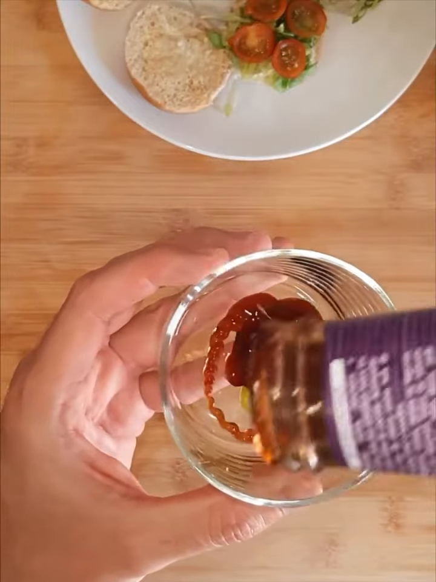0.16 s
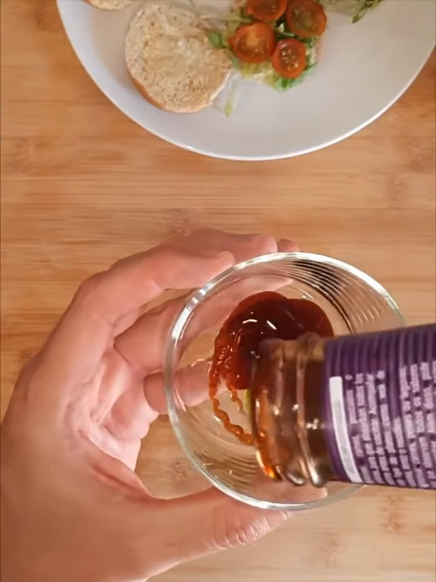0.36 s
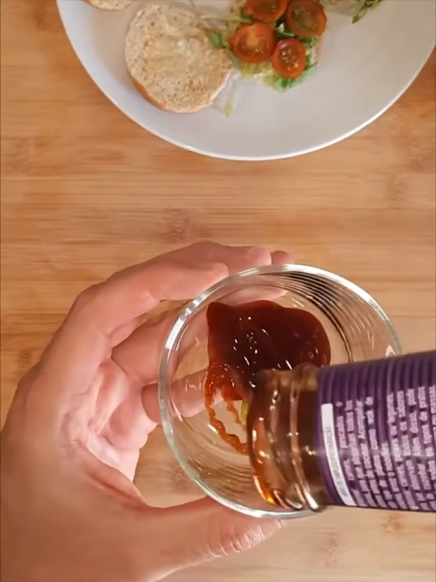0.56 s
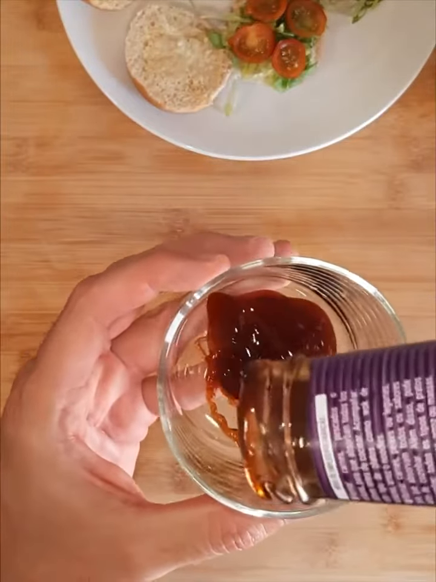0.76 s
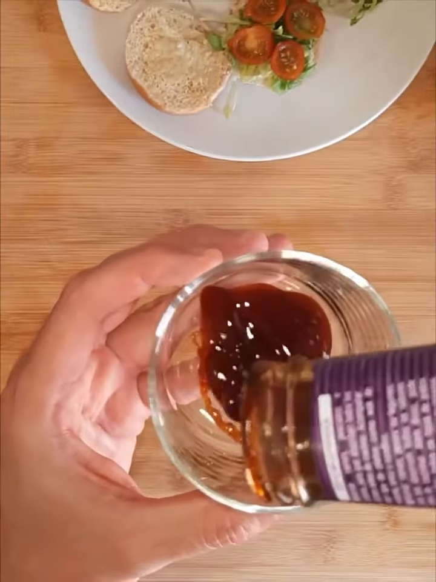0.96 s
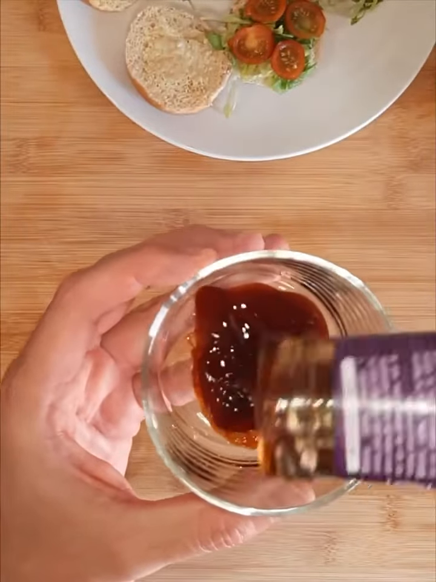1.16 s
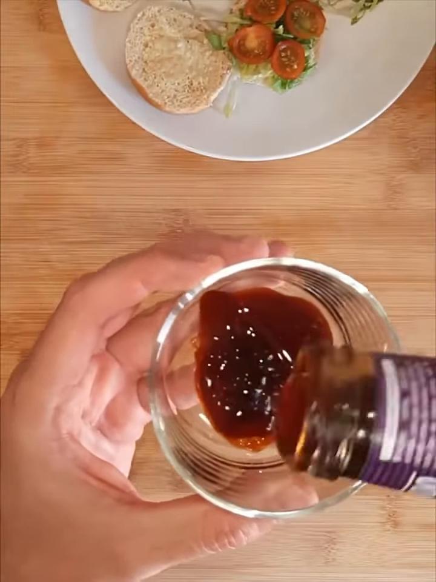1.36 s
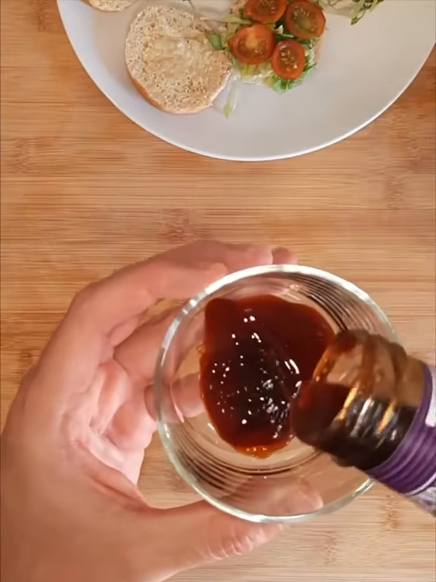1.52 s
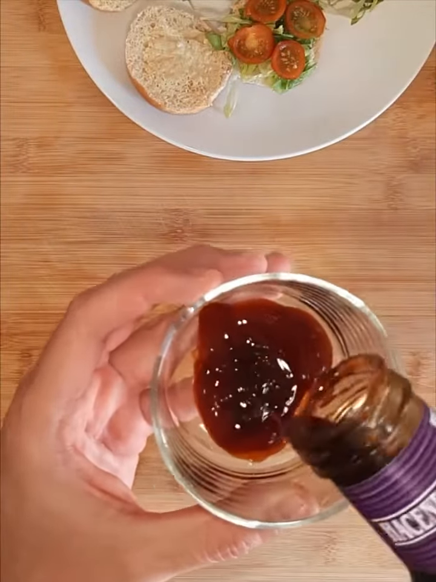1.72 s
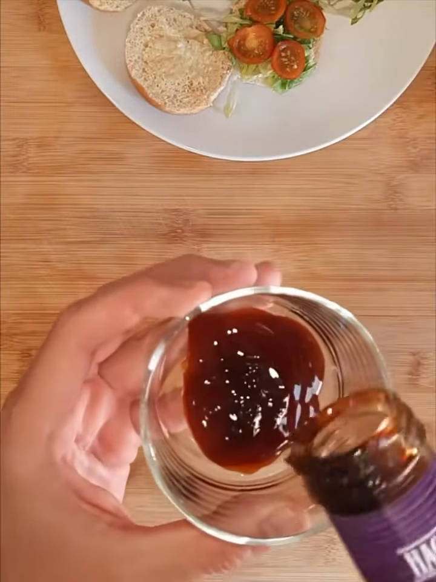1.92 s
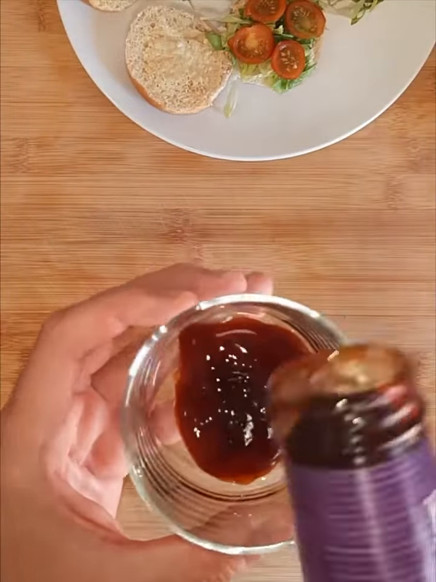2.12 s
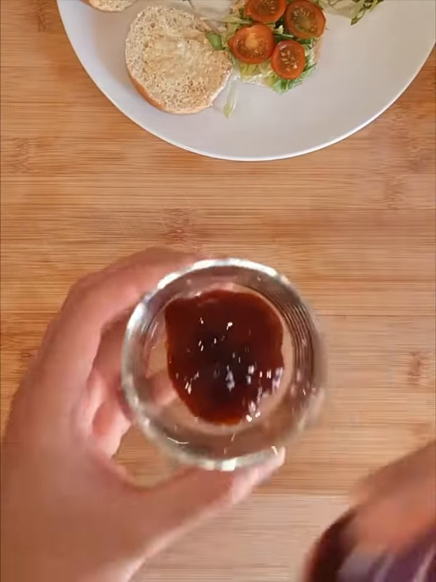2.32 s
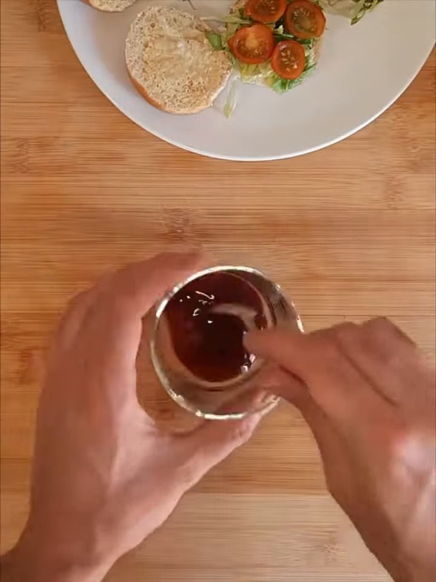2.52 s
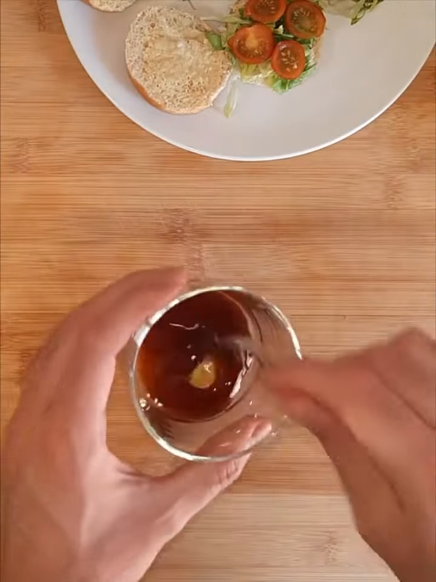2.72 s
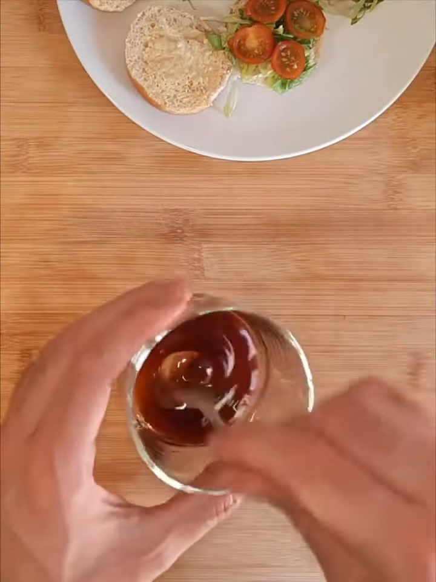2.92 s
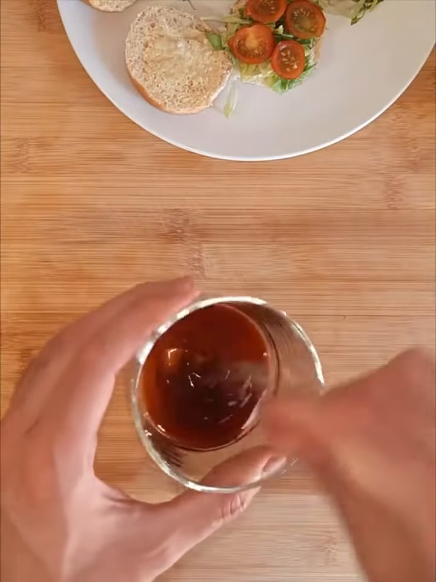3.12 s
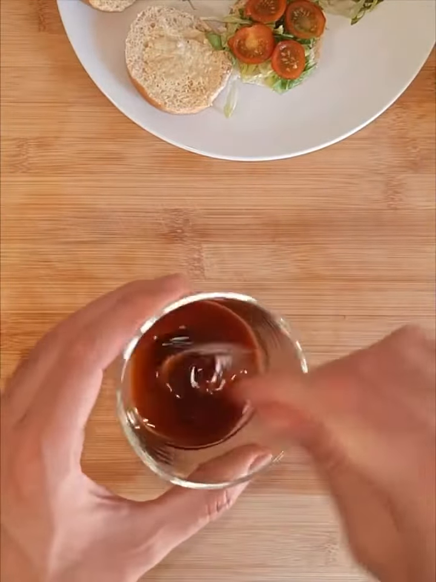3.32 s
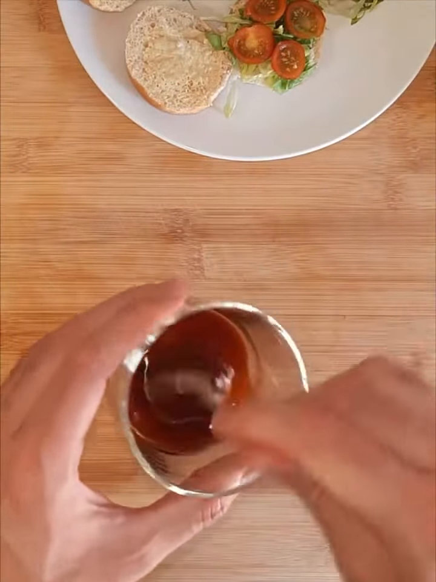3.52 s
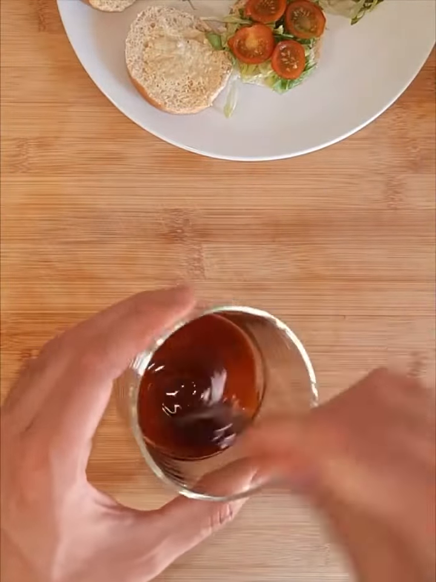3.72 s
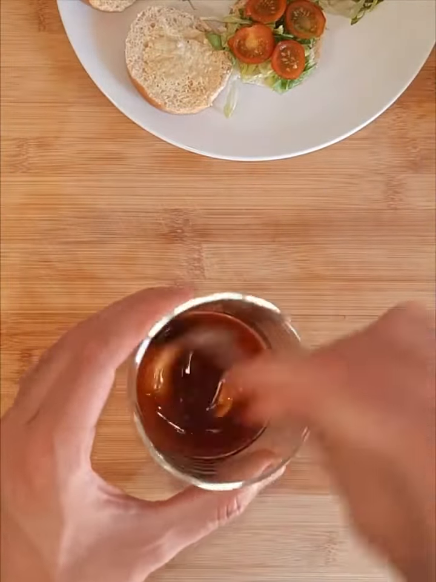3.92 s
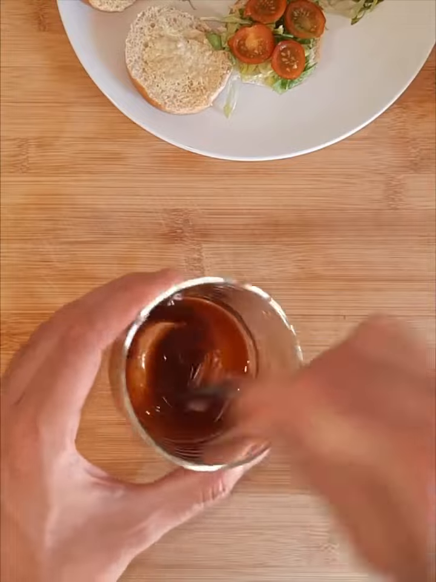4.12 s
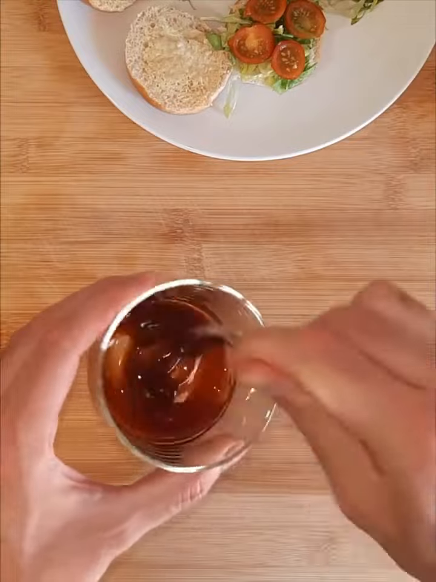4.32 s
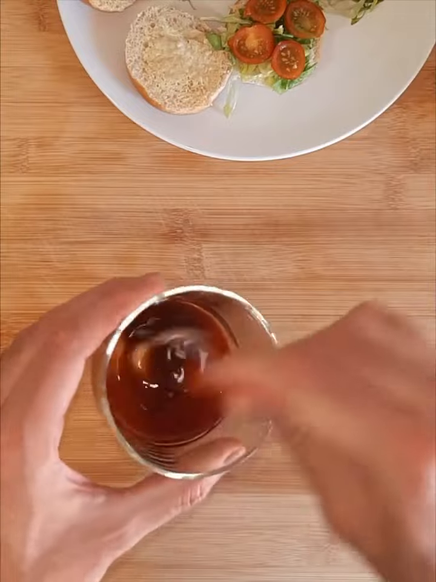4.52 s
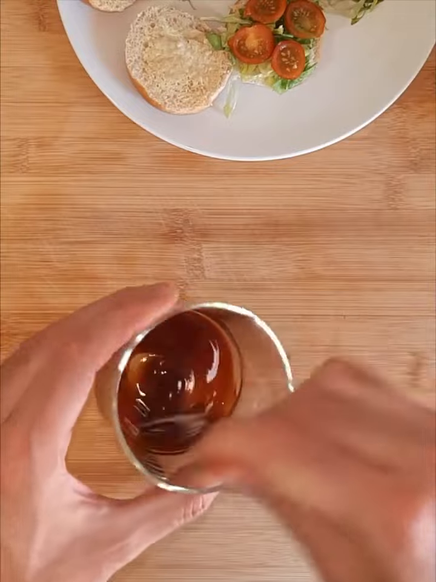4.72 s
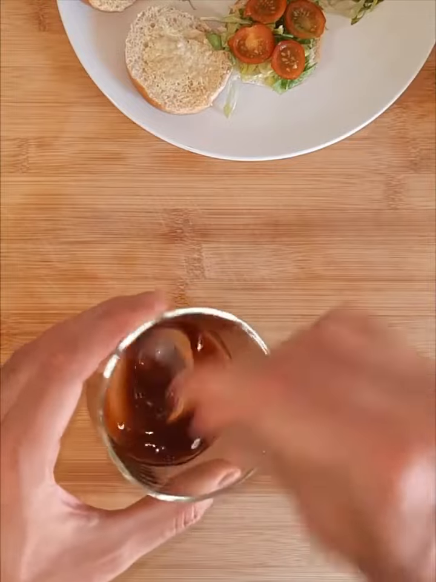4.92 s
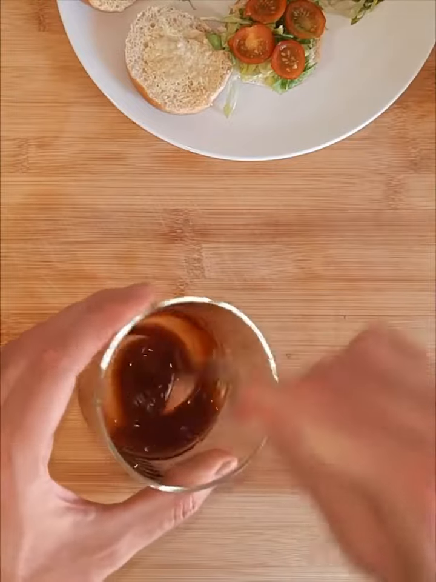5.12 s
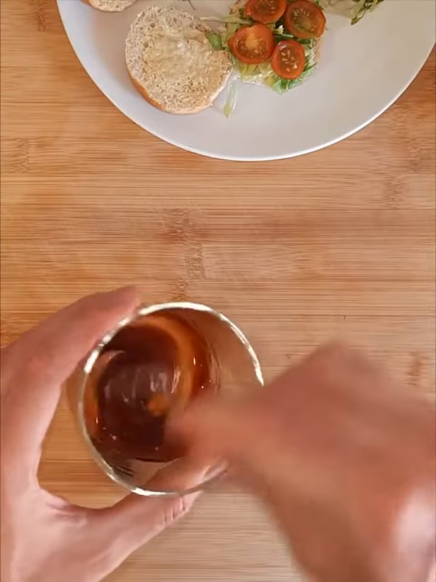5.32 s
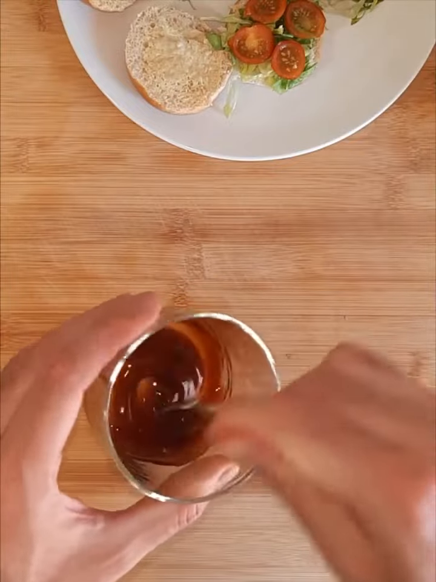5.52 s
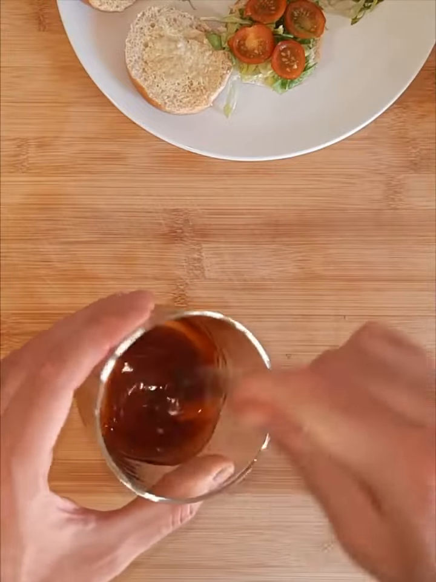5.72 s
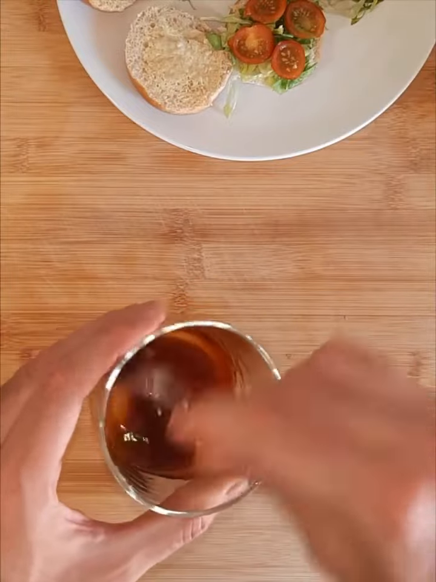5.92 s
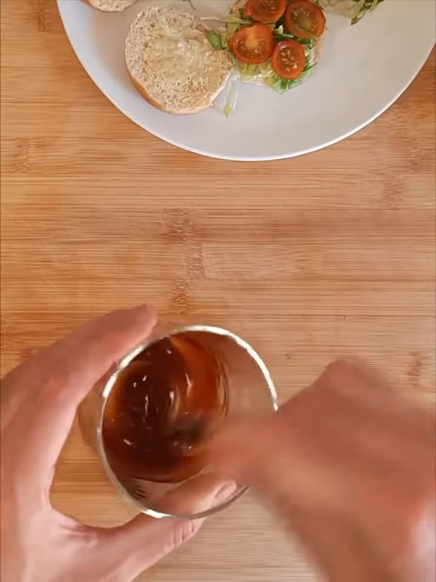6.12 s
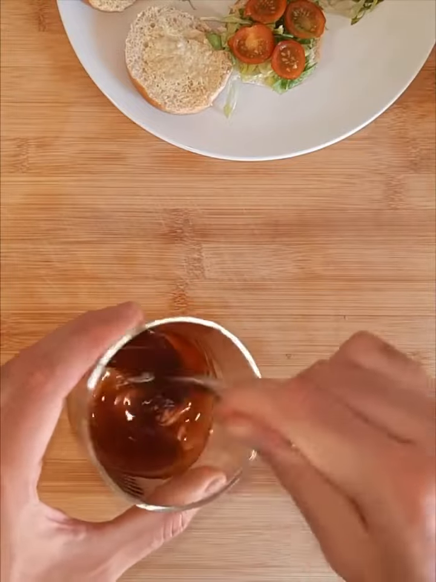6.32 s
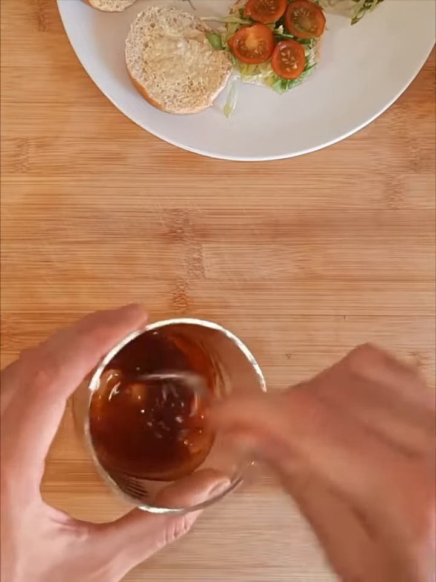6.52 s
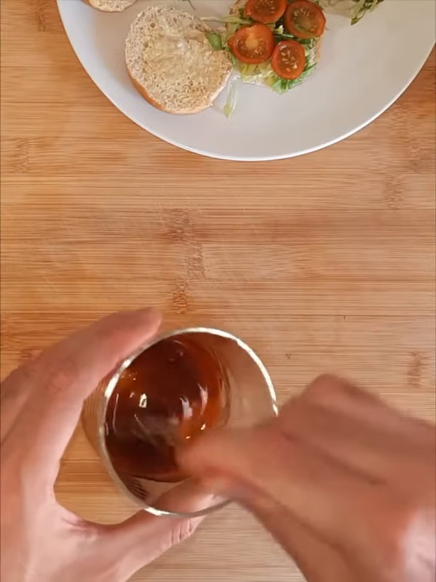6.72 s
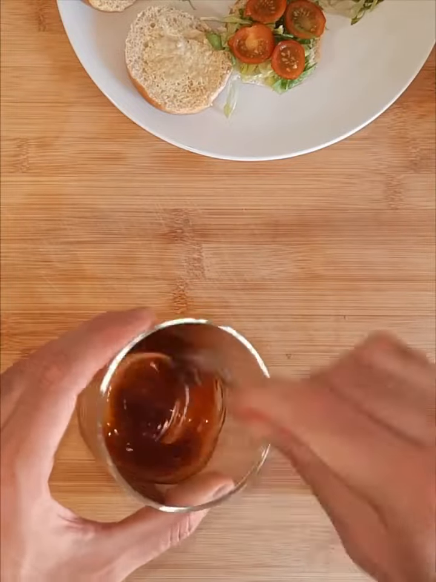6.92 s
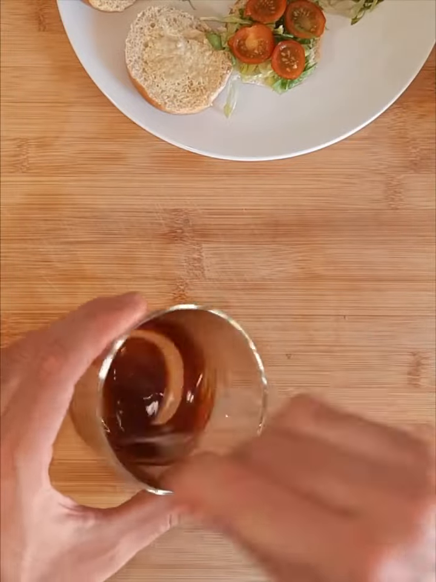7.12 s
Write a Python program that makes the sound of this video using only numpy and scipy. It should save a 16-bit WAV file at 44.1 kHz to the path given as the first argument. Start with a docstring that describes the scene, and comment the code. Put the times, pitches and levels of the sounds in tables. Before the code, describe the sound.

Thick sauce glugs faintly from a bottle into a small glass, then a metal spoon drops in and stirs briskly, clinking brightly against the sides.

```python
"""In a small hard-walled kitchen, thick sauce glugs softly from a bottle into a small hand-held glass.
Gulps of air squelch as shaped noise; the sauce swishes as noise that surges and plops as rising tones.
A steel spoon lands in the glass and stirs, rubbing and scraping as gritty noise. Its many clinks
are short blows that ring the modes of glass and spoon. The microphones are close above."""
import sys
import numpy as np
from scipy import signal
from scipy.fft import rfft, irfft, next_fast_len
from scipy.io import wavfile
from scipy.ndimage import map_coordinates

SR = 44100
rng = np.random.default_rng(int(sys.argv[2]) if len(sys.argv) > 2 else 0)


def generate_wav(signal):
    """Clip the signal to [-1, 1] and save it as 16-bit WAV at the path in sys.argv[1]."""
    frames = np.transpose(np.atleast_2d(signal))
    scaled = np.clip(frames, -1, 1) * 32767
    pcm = np.round(scaled).astype(np.int16)
    wavfile.write(sys.argv[1], SR, pcm)


N = 315756

HIT = 16384  # samples in the sound of one blow
LEAD_S = .004  # room left for the graze before a hit
TOP_HZ = 15950  # nothing is kept above this pitch


def amp(db):
    """Turn decibels into a gain."""
    return 10 ** (np.asarray(db) / 20)


def unit(x):
    """Scale to an rms of 1."""
    return x / np.sqrt(np.mean(x ** 2) + 1e-20)


def along(points, hz):
    """Read a (pitch_hz, value) table at any pitch, on a log pitch axis."""
    f, v = np.transpose(points)
    return np.interp(np.log(hz + 1), np.log(f + 1), v)


def curve(rows):
    """Join (time_s, value) rows by straight lines, one value per sample."""
    return np.interp(np.arange(N) / SR, *np.transpose(rows))


def wobble(rate):
    """Draw a smooth random curve with this many knots a second."""
    knots = rng.standard_normal(int(N * rate / SR) + 4)
    return map_coordinates(knots, [np.arange(N) * rate / SR])


def swells(rows):
    """Gain of smooth swells, one for each (middle_s, length_s, level_db) row."""
    t = np.arange(N) / SR
    return sum(amp(db) * np.cos(np.pi * np.clip((t - s) / length, -.5, .5)) ** 2 for s, length, db in rows)


def filtered(x, response):
    """Colour a sound with a response that depends on frequency."""
    m = next_fast_len(N + SR // 2)
    return irfft(rfft(x, m) * response(np.fft.rfftfreq(m, 1 / SR)), m)[..., :N]


def add(track, s, sound):
    """Mix a sound into the track at time s."""
    start = max(round(s * SR), 0)
    track[:, start:start + sound.shape[1]] += sound[:, :N - start]


# how alike noise is in the left and right channels: pitch_hz, likeness (0 to 1)
LEFT_RIGHT_LIKENESS = [(60, 0.9), (180, 0.73), (550, 0.24), (1650, 0.014), (4970, 0.02), (15000, 0.07)]


def rush(spectrum):
    """Stereo noise of rms 1 with the given colour, more alike left and right in the bass."""
    def turn(hz):
        return np.arccos(np.clip(along(LEFT_RIGHT_LIKENESS, hz), 0, 1)) / 2

    def colour(hz):
        return amp(along(spectrum, hz)) * [np.cos(turn(hz)), np.sin(turn(hz))]

    mid, side = filtered(rng.standard_normal((2, N)), colour)
    return unit(np.array([mid + side, mid - side]))


def bank(table, stretch=1):
    """One resonance for each (pitch_hz, width_hz, level_db) mode, all pitches times stretch."""
    f = np.fft.rfftfreq(HIT, 1 / SR)
    hz, width, db = np.transpose(table)[:, :, None]
    sign = (-1) ** np.arange(len(hz))[:, None]
    return sign * amp(db) * 1j * f * width / ((stretch * hz) ** 2 - f * f + 1j * f * width)


def modes(responses, scatter_db):
    """Sum of ringing modes, whose strengths change with the point struck."""
    return amp(scatter_db * rng.standard_normal(len(responses))) @ responses


def causal(spectrum):
    """Minimum-phase response: the given colour, with its energy as early as possible."""
    cepstrum = irfft(np.log(amp(along(spectrum, np.fft.rfftfreq(HIT, 1 / SR)))))
    cepstrum[1:HIT // 2] *= 2
    cepstrum[HIT // 2 + 1:] = 0
    return np.exp(rfft(cepstrum))


# how long echoes last in the kitchen: pitch_hz, time_to_fall_60_db_s
KITCHEN_DECAY = [(200, 0.094), (800, 0.3), (2000, 0.28), (5000, 0.25), (9000, 0.28), (15000, 0.14)]


def echoes(early_db=9, early_s=0.0034, onset_s=0.0014):
    """Dense echoes at both microphones: the board and hands first, then the kitchen walls."""
    hz, t, z = signal.stft(rng.standard_normal((2, HIT)), SR, nperseg=256)
    fading = z * amp(-60 * t / along(KITCHEN_DECAY, hz)[:, None])
    tail = signal.istft(fading, SR, nperseg=256)[1][:, :HIT]
    t = np.arange(HIT) / SR
    early_boost = 1 + amp(early_db) * np.exp(-t / early_s)
    tail = tail * early_boost * (1 - np.exp(-t / onset_s))
    return tail / np.linalg.norm(tail[0])


def path(walls, moved=0.46, left_db=-3.0, right_db=-8, arrival_s=.0012, lag_s=.0007):
    """Response from the glass to the microphones; the moving hands change a share of the echoes."""
    moved = np.clip(moved, 0, 1)
    f = np.fft.rfftfreq(HIT, 1 / SR)
    right_arrival_s = arrival_s + lag_s * rng.uniform(.4, 1.3)
    delay = np.round(SR * np.array([[arrival_s], [right_arrival_s]])) / SR  # whole samples
    direct = amp([[left_db], [right_db]]) * np.exp(-2j * np.pi * f * delay)
    return direct + rfft(np.sqrt(1 - moved) * walls + np.sqrt(moved) * echoes())


def chatter(bounce_db=-15, gap_s=0.0065, graze_db=-17, graze_s=.003, count=3):
    """The spoon grazes the glass, hits it, then skips a few more times, tending to get weaker."""
    f = np.fft.rfftfreq(HIT, 1 / SR)
    skips_s = np.cumsum(gap_s * rng.uniform(.3, 1.7, count))
    skips_db = bounce_db - 4 * np.arange(count) + rng.normal(0, 2, count)
    delays = np.r_[-np.clip(graze_s, 0, LEAD_S), 0, skips_s]
    sizes = amp(np.r_[graze_db, 0, skips_db])
    return sizes @ np.exp(-2j * np.pi * np.outer(delays + LEAD_S, f))


def struck(response):
    """The sound of one blow, rms 1 over its first 25 ms in each channel."""
    x = irfft(response, HIT)
    return x / np.sqrt(np.mean(x[:, :SR // 40] ** 2, axis=1, keepdims=True))


# colour of the quiet room: pitch_hz, relative_level_db
ROOM_COLOUR = [(12, -43.5), (20, -21.5), (110, -7), (277, -7.5), (526, -20), (658, -6.5), (735, -23.5),
               (894, -8), (1000, -22), (1320, -15), (1650, -25.5), (2010, -19), (3930, -24), (7270, -25),
               (15900, -30)]
# colour of the hand's rumble: pitch_hz, relative_level_db
HAND_COLOUR = [(40, -22.5), (65, -18.5), (85, 7), (110, -2), (150, 5.5), (200, -6), (260, 3.5), (400, -12),
               (700, -15), (1500, -53)]
# the grip on the glass, before the shared hand_db is added: time_s, level_db
HAND_LEVEL = [(0.0, -72.5), (1.13, -63.5), (1.25, -64.5), (2.79, -63), (4.07, -71), (5.1, -65.5),
              (5.52, -69.5), (7.16, -66.5)]


def background(room_db=-69, hand_db=1.0):
    """Steady room noise and the soft, fidgeting rumble of the hand that holds the glass."""
    fidget_db = 1.5 * wobble(16)
    room = amp(room_db) * rush(ROOM_COLOUR)
    hand = amp(curve(HAND_LEVEL) + hand_db + fidget_db) * rush(HAND_COLOUR)
    return room + hand


# air gulps into the bottle, each placed LEAD_S before its time where there is room: time_s, level_db
AIR_GULPS = [(0.018, -59.5), (0.68, -56.5), (1.35, -57), (2.016, -58.5)]
# resonances of the bottle neck: pitch_hz, width_hz, relative_level_db
BOTTLE_NECK = [(877, 110, 0), (1280, 150, 0), (1650, 500, -14)]
# colour of the fizz in a gulp: pitch_hz, relative_level_db
FIZZ_COLOUR = [(1500, -3), (3200, -13), (4700, 7), (6000, -5), (9000, -0.5), (11000, -12), (15000, -8.5)]


def glugs(swell_s=0.024, fizz_db=-2.0):
    """Each gulp of air squelches through the sauce in the neck: resonant noise plus fizz, in a swell."""
    out = np.zeros((2, N))
    u = np.arange(HIT) / SR / swell_s
    swell = u * np.exp(1 - u)  # reaches 1 after swell_s
    fizz = rush(FIZZ_COLOUR)
    for s, db in AIR_GULPS:
        noise = rng.standard_normal((2, HIT)) + rng.standard_normal(HIT)  # partly shared left and right
        neck = unit(irfft(rfft(noise) * bank(BOTTLE_NECK).sum(axis=0)))
        spray = fizz[:, round(s * SR):][:, :HIT]
        add(out, s - LEAD_S, amp(db) * swell * (neck + amp(fizz_db) * spray))
    return out


STIR_START_S = 2.37  # the spoon comes in


def in_glass(rise_s=0.078):
    """0 while the sauce is poured, rising to 1 once the spoon is at work."""
    return np.clip((np.arange(N) / SR - STIR_START_S) / rise_s, 0, 1)


# vigour of the stirring, at the crest of a turn: time_s, flow_gain_db
STIR_VIGOUR = [(2.6, -47.5), (3.7, -60), (4.6, -53), (5.2, -64.5), (5.8, -60), (7.16, -67.5)]
# the sauce slops over: middle_s, length_s, flow_gain_db
SAUCE_SLOPS = [(2.33, 0.21, -60), (3.82, .14, -58.5), (5.77, .16, -57.5), (6.13, 0.21, -73),
               (6.5, .13, -54.5), (6.9, 0.13, -57)]
CREST_S, TURN_S = 2.714, 0.618  # first crest of the sauce; one turn of the spoon
SWING_DB, TRICKLE_DB = 18, -77  # crest over trough; the sauce while it is only poured


def flow():
    """Gain of the moving sauce: a trickle at first, then one surge for each turn, plus slops."""
    trough = (1 - np.cos(2 * np.pi * (np.arange(N) / SR - CREST_S) / TURN_S)) / 2
    stirred = in_glass()
    trickle = (1 - stirred) * amp(TRICKLE_DB)
    surges = stirred * amp(curve(STIR_VIGOUR) - SWING_DB * trough)
    return trickle + surges + swells(SAUCE_SLOPS)


def bubbles(walls, db=-7, pitch_hz=690, spread=0.14, cycles=6, size_db=3.0, count=450):
    """Small pockets of air in the sauce plop with a slightly rising pitch, louder in a strong swirl."""
    pops = np.zeros((1, N))
    t = np.arange(SR // 10) / SR
    times = rng.uniform(0, N / SR, count)
    kinds = np.clip(rng.standard_normal((count, 2)), -2, 2)
    for s, (pitch, size) in zip(times, kinds):
        turns = pitch_hz * np.exp(spread * pitch) * t
        life = turns / cycles
        envelope = (1 - np.exp(-turns)) * np.exp(-life)
        tone = np.sin(2 * np.pi * turns * (1 + 0.033 * life))
        add(pops, s, (amp(size_db * size) * envelope * tone)[None])
    echoed = signal.fftconvolve(pops, walls, axes=1)[:, :N]
    return flow() * amp(db) * unit(pops + echoed)


# colour of the swishing sauce: pitch_hz, relative_level_db
SWISH_COLOUR = [(200, -11), (400, -4), (560, -5.5), (680, -5), (850, -7.5), (1400, -2), (3000, -13.5),
                (6000, -21)]
# colour of steel rubbing on glass: pitch_hz, relative_level_db
RUB_COLOUR = [(1500, -18), (3300, -11), (4600, 7), (5800, -8), (8000, 2.5), (10500, 3), (13000, -10),
              (16000, -5.5)]
# the spoon drags hard along the wall, before the grit varies it: middle_s, length_s, level_db
HARD_SCRAPES = [(2.42, 0.12, -70.5), (4.87, .28, -41), (5.79, .12, -36.5), (6.52, 0.11, -61.5),
                (7.1, .24, -48.5)]


def stirring(swish_db=-2, lumps_db=3, rub_db=-64, grit_db=3):
    """The sauce swishes in uneven lumps; the spoon rubs lightly along the glass and at times scrapes."""
    swish = flow() * amp(swish_db + lumps_db * wobble(60)) * rush(SWISH_COLOUR)
    pressure = amp(rub_db) * in_glass() + swells(HARD_SCRAPES)
    rub = pressure * amp(grit_db * wobble(56)) * rush(RUB_COLOUR)
    return swish + rub


# the thick bottom of the glass: pitch_hz, width_hz, relative_level_db
GLASS_BASE = [(937, 100, -12), (1235, 140, -10.5), (1682, 170, -1), (1795, 190, 3), (1966, 220, 4.5)]
# colour of the steel as it lands: pitch_hz, relative_level_db
LANDING_COLOUR = [(500, -27), (1000, -11.5), (1700, -13.5), (2300, -1.5), (3300, -8.5), (4700, -4),
                  (5400, -16.5), (7000, -2.5), (8100, -13), (9200, -3), (11800, 2.5), (12500, -18),
                  (15900, -18.5)]


def landing(walls, s=2.537, clack_db=-24.0, steel_db=-18.5, pan_db=-2.5):
    """The spoon lands on the thick bottom: a rattling clack of base modes and a burst of steel."""
    out = np.zeros((2, N))
    blow = path(walls) * chatter(bounce_db=-4, gap_s=.011, graze_db=-16)
    clack = struck(blow * bank(GLASS_BASE).sum(axis=0))
    steel = struck(blow * causal(LANDING_COLOUR))
    pan = amp([[pan_db / 2], [-pan_db / 2]])
    add(out, s - LEAD_S, (amp(clack_db) * clack + amp(steel_db) * steel) * pan)
    return out


def thicket(width_hz=62, count=110):
    """The many weak, unrelated partials of steel and glass, one at random in each slice of pitch."""
    hz = 1400 + (np.arange(count) + rng.uniform(0, 1, count)) * (TOP_HZ - 1400) / count
    widths = width_hz * rng.uniform(0.98, 1.66, count)
    return bank(np.column_stack([hz, widths, np.zeros(count)]))


FIRM_DB = -25  # strength of an ordinary, firm blow


def woken(rule, strength_db, depth):
    """Gain of one part of the sound for a blow of this strength and depth."""
    firm_db, growth, deep_db = rule
    return amp(firm_db + growth * (strength_db - FIRM_DB) + deep_db * depth)


# spoon against the glass: time_s, strength_db, depth (0 high on the wall, 1 down in the sauce),
# extra_low_ring_db
SPOON_HITS = [(2.661, -44, 0.65, 12), (2.873, -34, .02, 2), (2.914, -39.5, 0.13, 0),
              (3.002, -30, 0.033, 2.5), (3.079, -29, 1, 19), (3.185, -45.5, 1, 19), (3.24, -22, 0.26, 5.5),
              (3.412, -38.5, 0.73, 10), (3.469, -16.5, 0.43, 6.5), (3.487, -28.5, 0.053, -11),
              (3.733, -63.5, 0, -13), (3.865, -44.5, 0.92, 18), (3.971, -33, 0.059, 1.5),
              (4.141, -44, 0.53, 8), (4.336, -24, 0.082, -2), (4.6, -48.5, 0.74, 2),
              (4.623, -41.5, 0.84, 5.5), (4.751, -25, 0.51, 2.5), (4.813, -23, 0.32, 2.5),
              (4.878, -19.5, 0.6, -18), (4.968, -44, .05, 0.5), (5.035, -24, 0.64, -4),
              (5.119, -16, 0.28, 0), (5.327, -49, 0.48, 5), (5.374, -21.5, 0.17, 1), (5.564, -50, 0.21, -5),
              (5.611, -27, 0.17, 5), (5.727, -28, 0.066, 1.5), (5.81, -34, 0.69, 8.5),
              (5.903, -38.5, 0.43, -5), (6.137, -57, 0.22, -24), (6.229, -31, 0.01, 3.5),
              (6.342, -31, 0.19, 3.5), (6.836, -54.5, 0.2, -17.5), (6.868, -33, 0.26, -4),
              (6.929, -16, 0.46, -6), (6.997, -20.5, 0.77, -7.5), (7.073, -25, 0.33, -0.5),
              (7.147, -16.5, 0.3, -3.5)]
# Modes of each part: pitch_hz, width_hz, relative_level_db
# the glass, damped by the hand and the sauce
GLASS_MODES = [(4991, 132, 14), (5080, 380, -5), (5067, 55, 7), (4984, 220, -6), (7280, 320, -14),
               (10180, 80, -20)]
# the low ring of the glass, damped in the same way
LOW_GLASS_MODES = [(2417, 128, -2), (2454, 208, -4.5), (2507, 290, -14)]
# the steel of the spoon
SPOON_MODES = [(7560, 290, -5.5), (8867, 140, 3), (9576, 370, 3), (10195, 325, 5.5), (10200, 194, 8.5),
               (12800, 270, -22), (11730, 450, -13.5)]
# the bowl of the spoon
BOWL_MODES = [(4700, 410, -9.5), (4410, 310, -5.5), (6000, 69, -10.5), (6520, 230, 6), (6780, 400, 1.5)]
# thin, longer partials that every contact wakes
SHIMMER_MODES = [(2422, 10, -3), (10002, 16, 4), (10852, 12, -6), (11541, 22, 0), (13608, 20, -7),
                 (14642, 18, -12), (15676, 18, -15)]
# colour of the crack of contact: pitch_hz, relative_level_db
CONTACT_COLOUR = [(500, -24), (1500, -29.5), (2800, 1), (3600, 2), (4400, 5), (7500, 6.5), (8100, -19.5),
                  (9800, 1.5), (10600, -29), (12300, -12.5), (15800, -15.5)]
# colour of the knock passed to the board: pitch_hz, relative_level_db
KNOCK_COLOUR = [(30, -34), (90, -1.5), (200, 7), (400, 3.5), (800, -3), (2000, -45.5)]
# What a blow wakes: firm_wall_blow_db, growth (dB per dB of strength), gain_at_full_depth_db
# the ring of the wall
WALL_RULE = (-13, 1.0, -27.5)
# the low ring
LOW_RULE = (-26.5, 0.96, -24)
# the clack of the bottom
BASE_RULE = (-49, 0.46, 15.9)
# the knock of the board
BOARD_RULE = (-61.5, 2.3, -7.5)


def clinks(walls, partials, shimmer_db=-15, crack_db=-4.5, spoon_gain_db=-2.0, edge_hz=18500,
           hardening=0.018, detune=0.0057, bowl_db=0.5):
    """Each contact rings glass and spoon; deep ones clack on the bottom, hard ones knock the board."""
    out = np.zeros((2, N))
    f = np.fft.rfftfreq(HIT, 1 / SR)
    contact, knock = causal(CONTACT_COLOUR), causal(KNOCK_COLOUR)
    steel, bowl, shimmer, base = map(bank, (SPOON_MODES, BOWL_MODES, SHIMMER_MODES, GLASS_BASE))
    for s, db, depth, low_db in SPOON_HITS:
        # the sauce smothers the skips of a deep blow
        blow = path(walls) * chatter(bounce_db=-12.5 - 10 * depth)
        # a harder blow is shorter and so reaches higher
        reach_hz = edge_hz * np.exp(hardening * (db - FIRM_DB))
        touch = blow / np.sqrt(1 + (f / reach_hz) ** 10)

        # the swirling sauce loads the wall a little differently each time
        stretch = 1 + detune * rng.standard_normal()
        wall_ring = struck(touch * modes(bank(GLASS_MODES, stretch), scatter_db=3.5))
        low_ring = struck(touch * modes(bank(LOW_GLASS_MODES, stretch), scatter_db=9))
        glass = woken(WALL_RULE, db, depth) * wall_ring
        glass += amp(low_db) * woken(LOW_RULE, db, depth) * low_ring

        # low in the glass the bowl of the spoon takes the blow
        share = np.clip(1.25 * depth - .16, .08, .92)
        spoon = amp(bowl_db) * np.sqrt(share) * struck(touch * modes(bowl, scatter_db=11.5))
        spoon += np.sqrt(1 - share) * struck(touch * modes(steel, scatter_db=5))
        crack = struck(touch * contact * modes(partials, scatter_db=5.5))
        sparkle = struck(blow * modes(shimmer, scatter_db=3))
        spoon += amp(crack_db) * crack + amp(shimmer_db) * sparkle

        thud = woken(BASE_RULE, db, depth) * struck(touch * modes(base, scatter_db=5))
        thud += woken(BOARD_RULE, db, depth) * struck(blow * knock)
        # start early, so that the graze comes before the hit
        add(out, s - LEAD_S, glass + amp(db + spoon_gain_db) * spoon + thud)
    return out


def scene():
    """All sources together in the kitchen."""
    walls = echoes()
    pouring = background() + glugs()
    sauce = bubbles(walls) + stirring()
    spoon = landing(walls) + clinks(walls, thicket())
    return pouring + sauce + spoon


# microphone colour: pitch_hz, gain_db
MICROPHONE_COLOUR = [(100, -2.5), (9000, 0), (10250, 2.5), (10550, -6.5), (11500, 0.5), (13000, -0.5),
                     (15800, -4)]


def record(dry):
    """Colour by the microphone, clip at full scale, then remove all above the band limit."""
    heard = filtered(dry, lambda hz: amp(along(MICROPHONE_COLOUR, hz)))
    return filtered(np.clip(heard, -1, 1), lambda hz: hz < TOP_HZ)


dry = scene()
out = record(dry)
generate_wav(out)
```